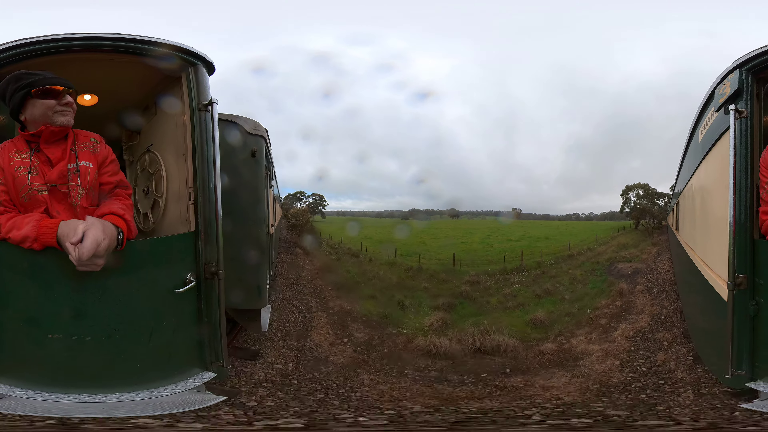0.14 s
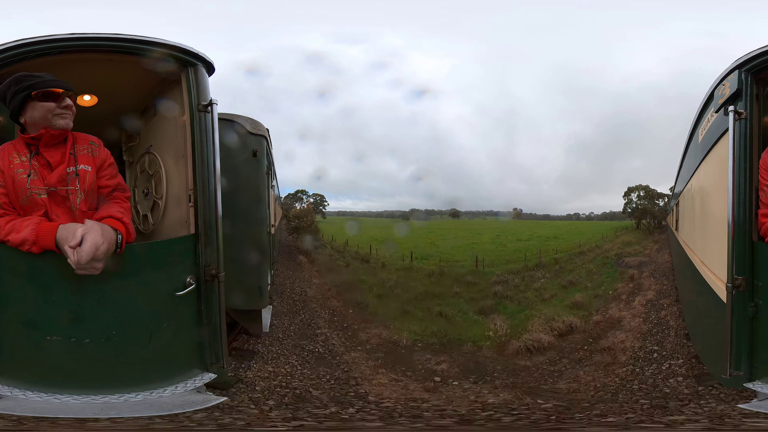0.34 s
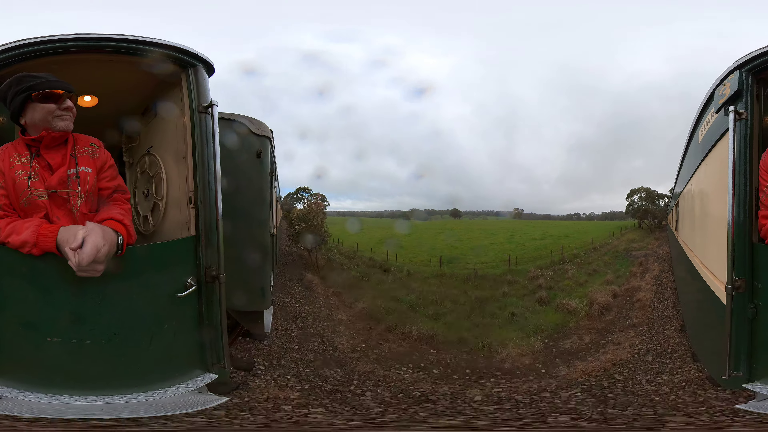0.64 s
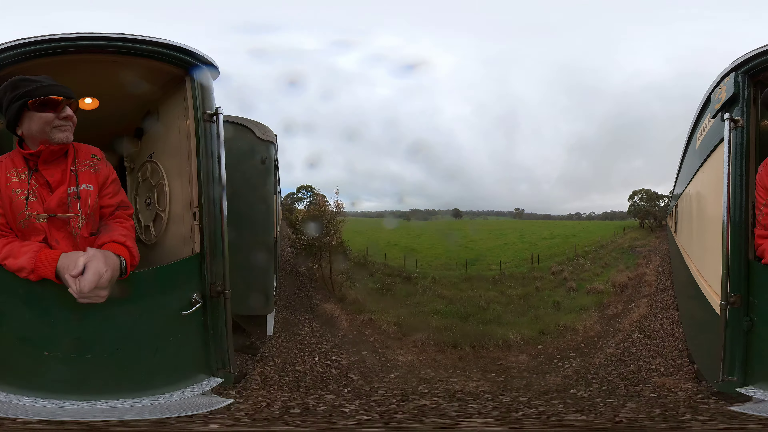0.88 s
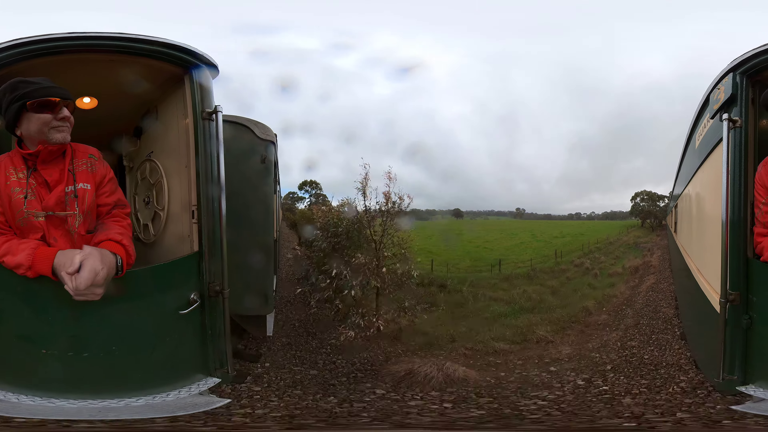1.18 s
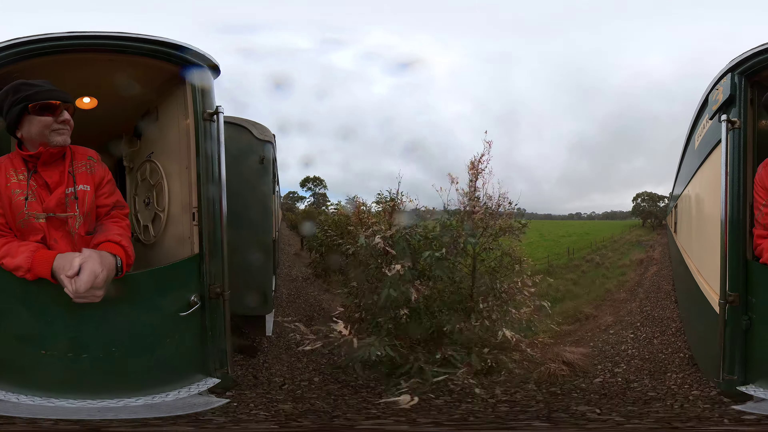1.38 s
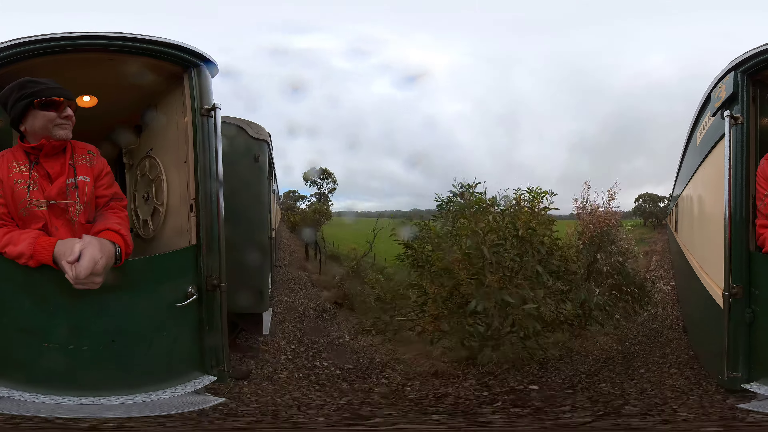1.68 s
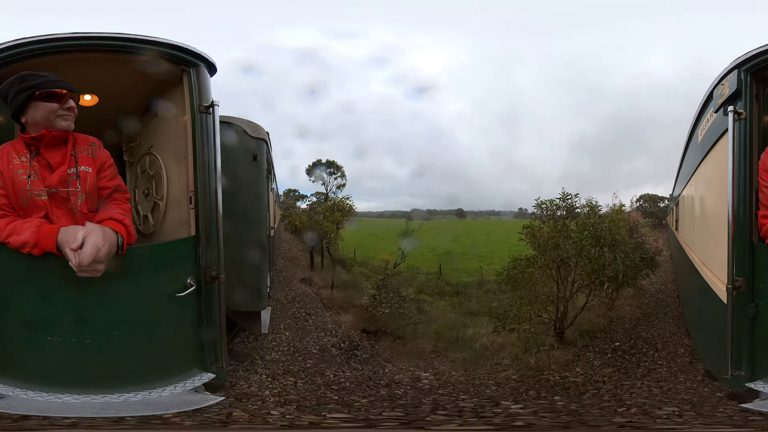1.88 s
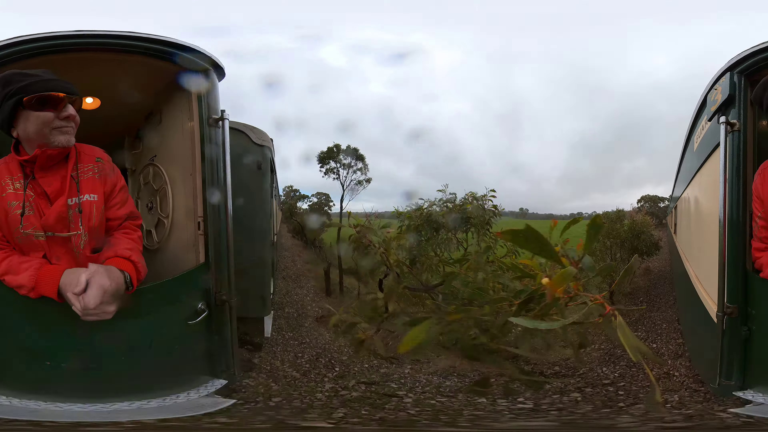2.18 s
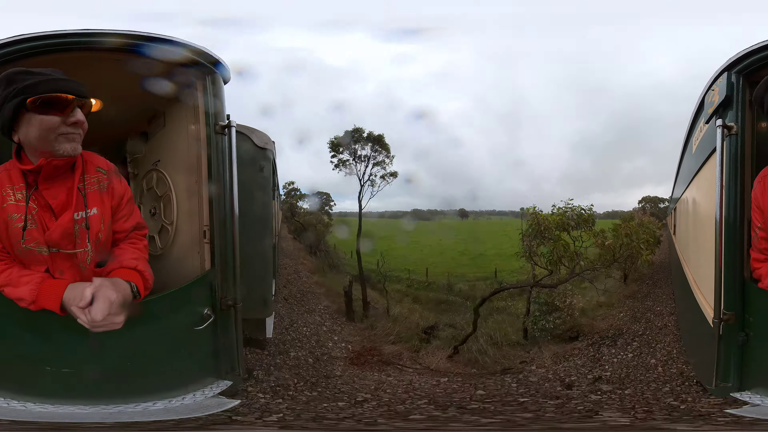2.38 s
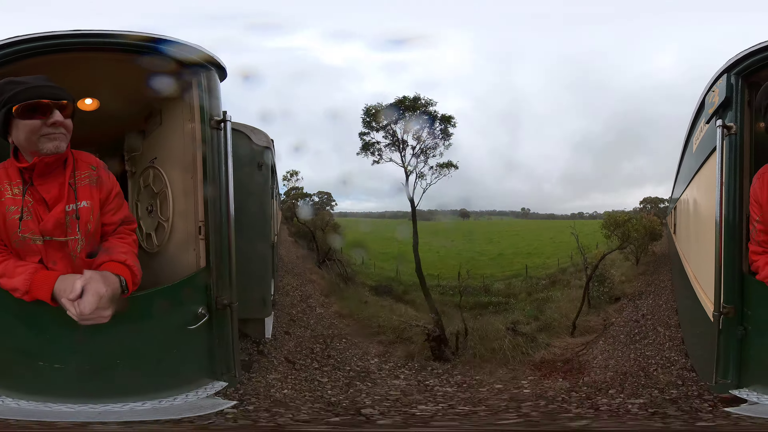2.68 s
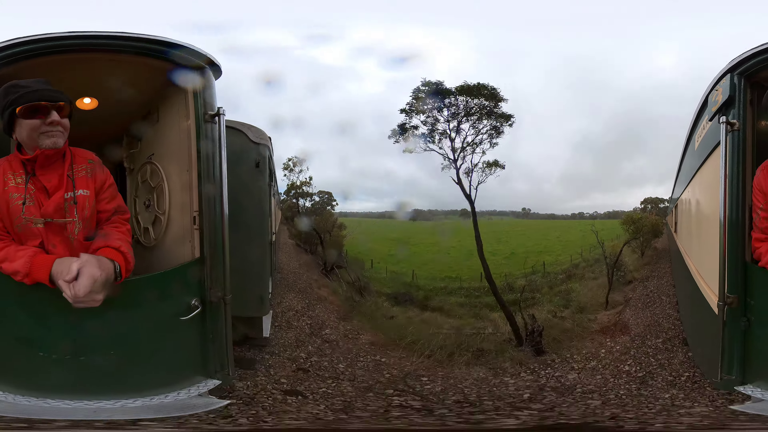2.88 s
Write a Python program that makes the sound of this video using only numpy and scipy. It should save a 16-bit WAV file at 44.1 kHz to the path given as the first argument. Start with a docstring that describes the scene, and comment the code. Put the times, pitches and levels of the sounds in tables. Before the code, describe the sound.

Heavy wind rumble and popping gusts beside a moving train, rails hissing, a loose bar clinking late.

```python
"""Wind buffets a small microphone outside the door of a train carriage rolling through open country.
Under its rumble and flutter, wheels hiss on the rails, a rough hum swells, and gusts pop and snap on the capsule.
Faint flange squeals pass, wheels knock over rail joints, and late on a loose metal bar bounces, clinks and rings.
Noise is coloured by spectrum tables and shaped by level curves; pops, snaps and the bar's ring are short waveforms."""
import sys
import numpy as np
from scipy import signal
from scipy.fft import rfft, irfft
from scipy.io import wavfile
from scipy.ndimage import uniform_filter1d, minimum_filter1d

SR = 44100
rng = np.random.default_rng(int(sys.argv[2]) if len(sys.argv) > 2 else 0)


def materialize(psi):
    """Save the field psi as 16-bit PCM at rate SR to the path in sys.argv[1].

    A 1-D psi becomes a single channel; in a 2-D psi each row is a channel.
    """
    bounded = np.clip(np.atleast_2d(psi).T, -1, 1)
    quanta = np.round(bounded * 32767).astype(np.int16)
    wavfile.write(sys.argv[1], SR, quanta)


N = 134064  # length in samples


def amp(db):
    """Turns decibels into an amplitude factor."""
    return 10 ** (np.asarray(db) / 20)


def evened(x):
    """Scales a sound to rms 1."""
    return x / np.sqrt(np.mean(x ** 2) + 1e-20)


def curve(rows):
    """Draws straight lines through (time_s, value) rows over the whole scene."""
    time_s, value = np.transpose(rows)
    return np.interp(np.arange(N) / SR, time_s, value)


def add(mix, start_s, sound):
    """Adds a sound into the mix at its start time, cut off at the end of the mix."""
    part = mix[round(start_s * SR):][:len(sound)]
    part += sound[:len(part)]


def coloured(x, tone):
    """Gives x the spectrum of a table, falling steeply outside it; rms 1."""
    hz = np.fft.rfftfreq(len(x), 1 / SR) + 1
    tone_hz, tone_db = np.transpose(tone)
    above = np.maximum(hz / tone_hz[-1], 1)
    below = np.maximum(tone_hz[0] / hz, 1)
    octaves_outside = np.log2(above * below)
    level_db = np.interp(np.log(hz), np.log(tone_hz), tone_db) - 20 * octaves_outside
    return evened(irfft(rfft(x) * amp(level_db), len(x)))


def wander(hz):
    """Random curve of rms 1, its movement fading out above hz."""
    f = np.fft.rfftfreq(N, 1 / SR)
    spectrum = rfft(rng.standard_normal(N)) * (f > 1) / (1 + (f / hz) ** 2)
    return evened(irfft(spectrum, N))


def bursts(rows, tone, rise_s):
    """Decaying bursts of coloured noise, each tilted brighter or duller and cut above its top."""
    out = np.zeros(N)
    t = np.arange(8192) / SR
    top_db_per_octave = -30
    for start_s, level_db, t60_s, tilt_db, top_hz in rows:
        tilted = []
        for hz, db in tone:
            tilt = tilt_db * np.log2(hz / 1000)
            cut = top_db_per_octave * np.log2(max(hz / top_hz, 1))
            tilted.append((hz, db + tilt + cut))
        noise = coloured(rng.standard_normal(len(t)), tilted)
        decay = amp(level_db - 60 * t / max(t60_s, .005))
        add(out, start_s, noise * np.minimum(t / rise_s, 1) * decay)
    return out


# low rumble of wind on the microphone: time_s, level_db
WIND_LEVEL = [(0.0, -21), (0.03, -24), (0.06, -11), (0.56, -12.5), (0.68, -30), (0.71, -11.5),
              (1.02, -11.5), (1.03, -23.5), (1.16, -9.5), (1.53, -21), (1.55, -13.5), (1.9, -11.5),
              (1.92, -17.5), (2.12, -10), (2.35, -15.5), (2.37, -9), (2.91, -14.5), (3.02, -5)]
# flutter of eddies above the rumble: time_s, level_db (before EDDY_BOOST_DB)
EDDY_LEVEL = [(0.0, -28), (0.05, -23), (0.17, -26.5), (0.23, -19), (0.5, -23), (0.51, -14), (0.55, -21),
              (0.84, -23.5), (0.85, -21), (1.07, -26.5), (1.08, -28), (1.19, -23.5), (1.21, -18.5),
              (1.26, -22.5), (1.55, -22.5), (1.64, -26.5), (1.66, -15.5), (1.7, -22.5), (1.98, -24),
              (2.0, -13), (2.05, -27.5), (2.08, -16.5), (2.1, -40), (2.13, -10), (2.16, -35.5), (2.25, -9),
              (2.27, -35), (2.29, -17), (2.31, -25.5), (2.51, -20.5), (2.53, -30), (2.57, -19.5),
              (2.66, -27), (2.72, -20.5), (2.78, -25), (2.9, -18.5), (2.93, -14), (2.94, -37), (2.98, -15),
              (3.01, -23), (3.02, -11)]
# spectrum of the wind: pitch_hz, relative level_db per Hz
WIND_TONE = [(8.8, -40.5), (15, -8.5), (38, 2), (76, 4), (184, -5), (397, -15), (606, -20.5), (841, -27),
             (1020, -32), (1500, -49.5), (1950, -76)]
LUMP_DB, LUMP_HZ = 2, 30.8  # rms depth and speed of the rumble's lumps
EDDY_DB, EDDY_HZ = 3.5, 85  # rms depth and speed of the eddies' own flutter
EDDY_FROM_HZ, EDDY_BOOST_DB = 227.6, 2.5


def wind():
    """Lumpy low rumble with quick eddies fluttering above it."""
    noise = coloured(rng.standard_normal(N), WIND_TONE)
    low_pass = signal.butter(2, EDDY_FROM_HZ, fs=SR, output="sos")
    low = signal.sosfiltfilt(low_pass, noise)
    lumps = wander(LUMP_HZ)
    rumble = evened(low * amp(LUMP_DB * lumps))
    # the eddies share part of the rumble's lumps
    flutter = amp(0.61 * LUMP_DB * lumps + EDDY_DB * wander(EDDY_HZ))
    eddies = evened((noise - low) * flutter)
    return amp(curve(WIND_LEVEL)) * rumble + amp(curve(EDDY_LEVEL) + EDDY_BOOST_DB) * eddies


# rush of wheels on rails, sinking under the gusts: time_s, level_db (before ROLL_DB)
ROLL_LEVEL = [(0, -39.5), (.08, -47.5), (.14, -42.5), (.18, -45), (.195, -60), (.215, -44), (.25, -54),
              (.275, -41.5), (.34, -42), (.38, -43), (.48, -40.5), (.69, -42.5), (.81, -46), (.84, -41),
              (.88, -46), (.91, -41.5), (1.06, -42), (1.15, -43), (1.2, -42.5), (1.245, -51), (1.31, -40.5),
              (1.53, -41), (1.62, -43.5), (1.75, -39.5), (1.82, -43.5), (1.88, -39), (1.96, -42),
              (2.07, -42.5), (2.13, -39), (2.195, -54.5), (2.245, -34), (2.272, -49.5), (2.31, -39),
              (2.52, -42), (2.565, -56.5), (2.61, -42), (2.65, -51), (2.665, -60), (2.71, -55),
              (2.74, -44.5), (2.83, -42.5), (2.855, -46.5), (2.89, -38), (2.93, -49), (2.96, -59),
              (3.02, -45)]
# spectrum of the rush: pitch_hz, relative level_db per Hz
ROLL_TONE = [(350, -27), (600, -3.5), (1000, -6.5), (1500, -9), (2800, -16), (3600, -20.5), (4800, -24.5),
             (5800, -24), (7200, -33), (8800, -52)]
ROLL_DB = 8.5  # added to the whole level curve
PATCH_DB, FLICKER_DB = 1.2, .8  # rms depths


def roll():
    """Wide rush of wheels on rails, in drifting spectral patches with a light flicker."""
    noise = coloured(rng.standard_normal(N), ROLL_TONE)
    spectra = signal.stft(noise, nperseg=256, noverlap=192)[2]
    patches = rng.standard_normal(spectra.T.shape)
    patches = uniform_filter1d(patches, size=40, axis=0)  # along time
    patches = evened(uniform_filter1d(patches, size=4, axis=1))  # along pitch
    patchy = spectra * amp(PATCH_DB * patches.T)
    rush = signal.istft(patchy, nperseg=256, noverlap=192)[1][:N]
    return amp(curve(ROLL_LEVEL) + ROLL_DB) * evened(rush * amp(FLICKER_DB * wander(30)))


# swell of the rails' hum under the rush: time_s, level_db
HUM_LEVEL = [(0, -39.5), (.45, -42.5), (.53, -33), (.77, -34), (.82, -42.5), (1.3, -43), (1.45, -42),
             (2.0, -46.5), (3.04, -46.5)]
# spectrum of the hum: pitch_hz, relative level_db per Hz
HUM_TONE = [(700, -20), (1030, 6.5), (1150, -3), (1280, -6.5), (1700, -5.5), (2600, -12), (3500, -31.5)]
HUM_ROUGH_DB = 3  # rms depth


def hum():
    """Rails' hum: a rough mid band of noise that swells between the joints."""
    noise = coloured(rng.standard_normal(N), HUM_TONE)
    return amp(curve(HUM_LEVEL)) * evened(noise * amp(HUM_ROUGH_DB * wander(40)))


POP_SWING, POP_SETTLE = 3.73, 0.16  # phase (radians) where the push turns back; extra damping


def push(hz):
    """One quick push of the diaphragm and a slower swing back."""
    u = 2 * np.pi * hz * np.arange(2000) / SR
    return 2 * u ** 3 * (1 - u / POP_SWING) * np.exp(-u - POP_SETTLE * u ** 0.8 / 4)


# pops of wind straight on the capsule: time_s (near the push's crest), level_db, brightness_hz
POPS = [(0.122, -1, 300), (0.195, -7, 750), (.229, -3, 620), (0.2353, -5, 446), (0.415, -2, 350),
        (.870, 0, 300), (1.216, 0.5, 353), (1.251, -24, 350), (2.073, -9, 298), (2.171, -0.5, 300),
        (2.205, -13, 350), (2.497, -3, 350), (2.574, -6.5, 500), (2.580, -0.5, 454), (2.668, -9, 700),
        (2.685, -4, 490), (2.7015, -6.5, 710), (2.721, 1.5, 400), (2.738, -2.5, 400), (2.848, 5, 450),
        (2.925, -3.5, 450), (2.956, -5, 450), (2.978, -16, 400), (3.001, 11, 450)]
# spectrum of the housing's rattle: pitch_hz, relative level_db per Hz
RATTLE_TONE = [(300, 0), (900, 2), (1700, -5), (3000, -24.5), (6000, -42.5)]
RATTLE_DB, RATTLE_T60_S = -11, .009  # level relative to its pop; decay
# brightness of the lesser random pops: brightness_hz
STRAY_HZ = [105, 170, 262]
STRAY_PER_S = 68  # average, shared among the brightnesses
STRAY_DB, STRAY_SPREAD_DB = -26, 5.5  # quietest level; mean of the random rise, before its cap


def pops():
    """Strong pushes on the capsule with a rattle of the housing, over a scatter of duller pops."""
    rattles = [(s, db + RATTLE_DB, RATTLE_T60_S, 0, SR) for s, db, _ in POPS]
    out = bursts(rattles, RATTLE_TONE, 0.0012)
    for time_s, level_db, hz in POPS:
        add(out, time_s - 1 / (np.pi * hz), amp(level_db) * push(hz))
    for hz in STRAY_HZ:
        rise_db = STRAY_SPREAD_DB * np.minimum(rng.exponential(1, N), 4)
        size = amp(STRAY_DB + rise_db) * rng.choice([-1, 1], N)
        strikes = rng.random(N) < STRAY_PER_S / len(STRAY_HZ) / SR
        out += signal.oaconvolve(size * strikes, push(hz))[:N]
    return out


# dry snaps where a gust breaks on the capsule edge: start_s, level_db, pitch_hz
SNAPS = [(.1943, -14, 1250), (.2278, -9.5, 1200), (0.2302, -11, 1100), (0.2325, -7.5, 1530),
         (2.557, -17.5, 1100), (2.576, -23.5, 1600), (2.5795, -25, 1390), (2.6674, -15, 1500),
         (2.6869, -20.5, 1700), (2.6905, -20, 2000), (2.701, -23, 1900), (2.7046, -20, 1500),
         (2.71, -23, 1420), (2.7995, -22.5, 2000), (2.8475, -25, 1300), (2.9575, -28, 1250),
         (2.971, -17, 1050), (2.979, -13, 1000)]
SNAP_CYCLES = .26  # time constant of the swell and fade, in cycles


def snaps():
    """Sine snaps of a cycle or two each, swelling and gone at once."""
    out = np.zeros(N)
    t = np.arange(600) / SR
    for start_s, level_db, hz in SNAPS:
        u = t * hz / SNAP_CYCLES
        envelope = 2 * u ** 2 * np.exp(-u)
        add(out, start_s, amp(level_db) * envelope * np.sin(2 * np.pi * hz * t))
    return out


# squeals of flange on rail: start_s, length_s, pitch_hz, level_db
SQUEALS = [(0.412, 0.092, 4920, -46), (0.597, 0.042, 3600, -43), (0.928, 0.023, 3760, -48),
           (1.711, 0.043, 4400, -43)]
SQUEAL_WIDTH_HZ, SQUEAL_CLEAR = 420, .9  # width of the fuzz; steady tone against fuzz of spread 1


def squeal():
    """Short whistles of flange on rail: a steady tone blurred by narrow noise around its pitch."""
    out = np.zeros(N)
    t = np.arange(6000) / SR
    r = np.exp(-np.pi * SQUEAL_WIDTH_HZ / SR)
    for start_s, length_s, hz, level_db in SQUEALS:
        noise = rng.standard_normal((len(t), 2)) @ [1, 1j]  # complex noise
        fuzz = signal.lfilter([1], [1, -2 * r, r * r], noise)
        carrier = np.exp(2j * np.pi * hz * t)
        whistle = evened(((fuzz / np.std(fuzz) + SQUEAL_CLEAR) * carrier).real)
        swell = np.sin(np.pi * np.minimum(t / length_s, 1)).clip(0) ** .5
        add(out, start_s, amp(level_db) * swell * whistle)
    return out


# knocks of wheels over rail joints: start_s, level_db, t60_s, tilt_db per octave, top_hz
KNOCKS = [(.502, -3.5, 0.083, -0.75, 6500), (.846, -19.5, 0.075, 4.5, 3500),
          (.8515, -11.5, 0.063, 1.5, 3500), (1.076, -10, 0.25, -2, 6000), (1.17, -20, 0.11, 2.5, 7000),
          (1.308, -22, 0.23, 1, 7000), (1.648, -14, 0.15, 0.5, 6000), (1.702, -30, 0.13, 5, 6000),
          (2.002, -19, 0.098, 1.9, 6000), (2.113, -10.5, 0.15, -3, 6000), (2.224, -15, 0.11, -3.5, 6000),
          (2.799, -9.5, 0.078, -2, 3000), (2.896, -4, 0.07, -2.5, 2970)]
# spectrum of a knock before its tilt: pitch_hz, relative level_db per Hz
KNOCK_TONE = [(88, -35.5), (150, -3.5), (439, -2.5), (1550, -26), (2810, -28), (3110, -32), (3940, -34),
              (5830, -36.5), (8780, -64)]


def knocks():
    """Wheels over rail joints: noise bursts with a quick rise and a decay of their own."""
    return bursts(KNOCKS, KNOCK_TONE, rise_s=.0018)


# bounces of the loose bar: start_s, clack level_db, t60_s, tilt_db per octave, crack level_db
BOUNCES = [(2.28, -13, 0.043, -4, -37), (2.2828, -13, 0.054, 1, -22), (2.293, -12.5, 0.047, 2.5, -18),
           (2.3013, -13, 0.034, -1, -7)]
# spectrum of a clack before its tilt: pitch_hz, relative level_db per Hz
CLACK_TONE = [(180, -32), (400, -7.5), (800, 0), (1500, -9.5), (2300, -25), (3100, -16), (4800, -28),
              (6000, -21.5), (7310, -24.5), (8780, -45)]
# pitches of the bar's ringing modes: pitch_hz
BAR_HZ = [1427, 3865, 7419, 8581]
# the same modes in order: relative level_db, t60_s
BAR_MODES = [(5, 0.34), (-1, 0.27), (-13, 0.092), (-29.5, 0.11)]
BOUNCE_RING_DB = -11  # ring of a bounce relative to its clack
CRACK_FROM_HZ, CRACK_HZ, CRACK_GLIDE_S, CRACK_T60_S = 3300, 1500, .0006, 0.022
RING_S, RING_DB, RING_RISE_S = 2.304, -17, 0.011  # free ring: start, level, rise time constant
DAMP_S, DAMP_T60_S = 2.435, .08  # the bar comes to rest: start, added decay


def bar():
    """Bounces clack, crack and briefly ring; then the modes ring freely until the bar comes to rest."""
    out = bursts([(*row[:4], SR) for row in BOUNCES], CLACK_TONE, 0.001)
    t = np.arange(SR // 2) / SR
    ring = np.zeros(len(t))
    for hz, (level_db, t60_s) in zip(BAR_HZ, BAR_MODES):
        ring += amp(level_db - 60 * t / t60_s) * np.sin(2 * np.pi * hz * t)
    # the crack's pitch glides down
    crack_hz = CRACK_HZ + (CRACK_FROM_HZ - CRACK_HZ) * np.exp(-t / CRACK_GLIDE_S)
    crack = np.sin(2 * np.pi * np.cumsum(crack_hz) / SR)
    crack_rise = np.minimum(t / 0.00024, 1)
    for start_s, clack_db, t60_s, _, crack_db in BOUNCES:
        add(out, start_s, amp(clack_db + BOUNCE_RING_DB - 60 * t / t60_s) * ring)
        add(out, start_s, amp(crack_db - 60 * t / CRACK_T60_S) * crack_rise * crack)
    rest_db = -60 * np.maximum(t + RING_S - DAMP_S, 0) / DAMP_T60_S
    ring_rise = 1 - np.exp(-t / RING_RISE_S)
    add(out, RING_S, amp(RING_DB + rest_db) * ring_rise * ring)
    return out


def scene():
    """Sums all the layers into one channel."""
    air_and_rails = wind() + roll() + hum()
    capsule = pops() + snaps()
    metal = squeal() + knocks() + bar()
    return (air_and_rails + capsule + metal)[None]


CEILING, EDGE_HZ = .8, 8900  # limiter peak amplitude; top of the band


def record(dry):
    """A quick limiter holds the peaks under the ceiling; then a low-pass limits the band."""
    peak = -minimum_filter1d(-abs(dry), size=401, axis=1)  # loudest sample nearby
    gain = np.minimum(CEILING / (peak + 1e-9), 1)
    gain = uniform_filter1d(gain, size=301, axis=1)
    low_pass = signal.firwin(511, EDGE_HZ, window=("kaiser", 9), fs=SR)
    return signal.oaconvolve(dry * gain, low_pass[None], "same")


dry = scene()
out = record(dry)
materialize(out)
```